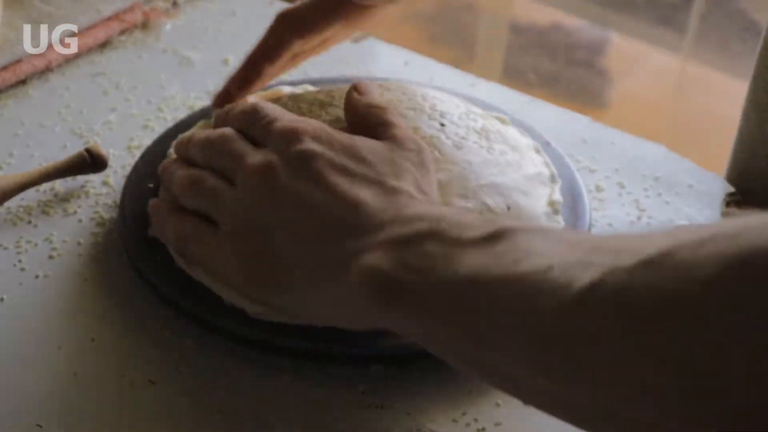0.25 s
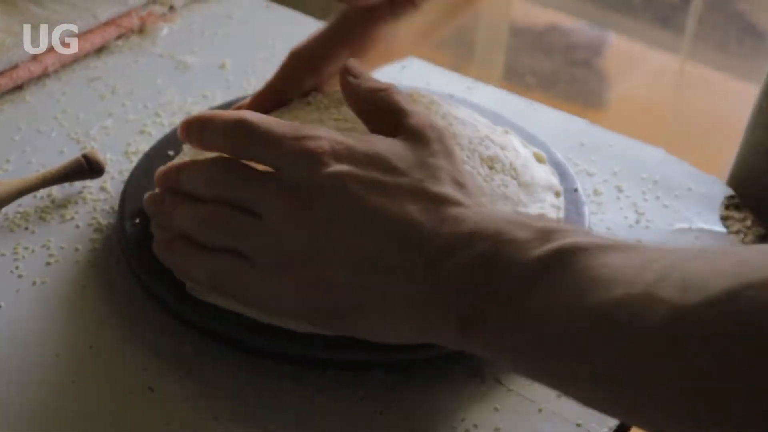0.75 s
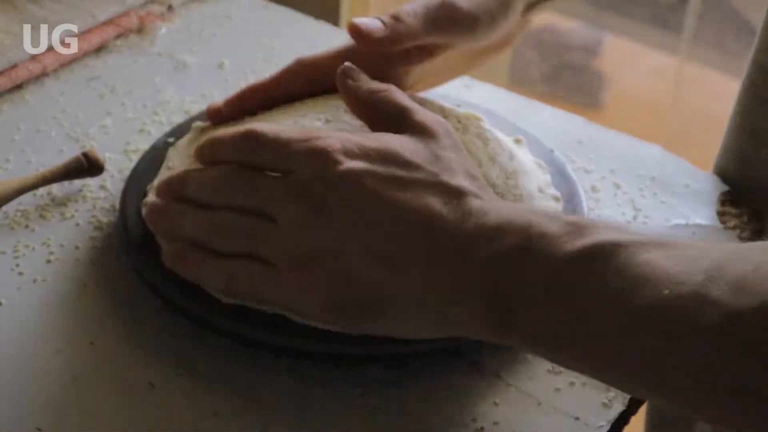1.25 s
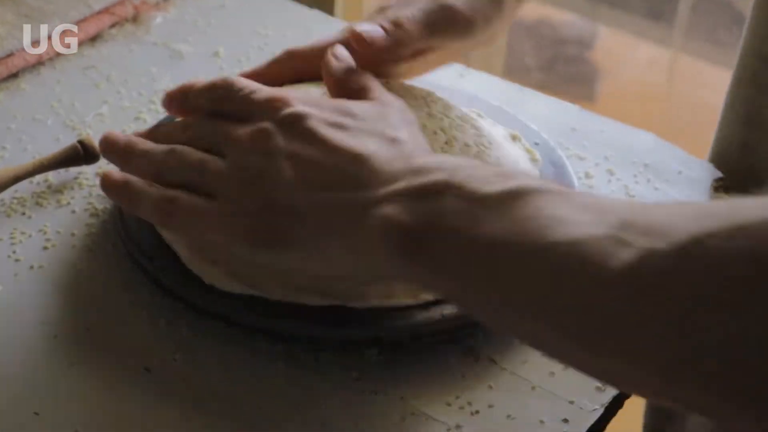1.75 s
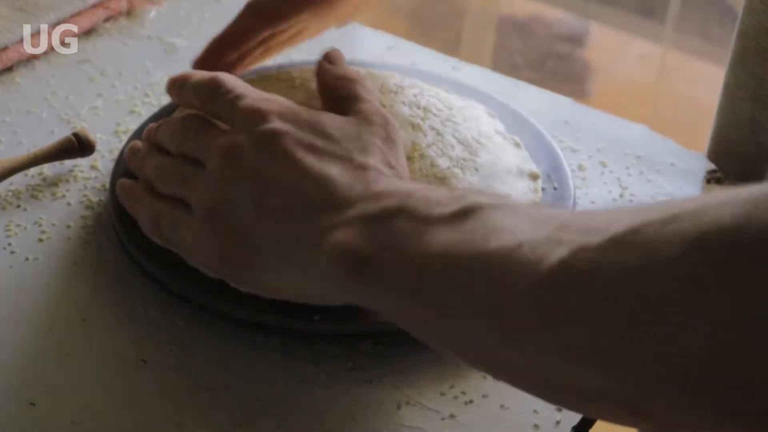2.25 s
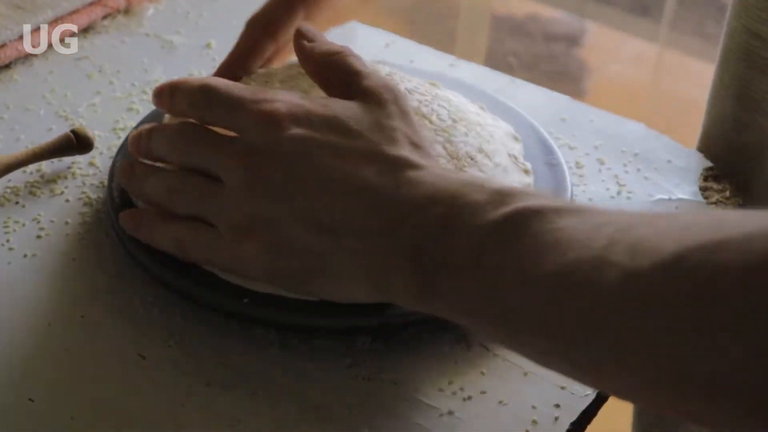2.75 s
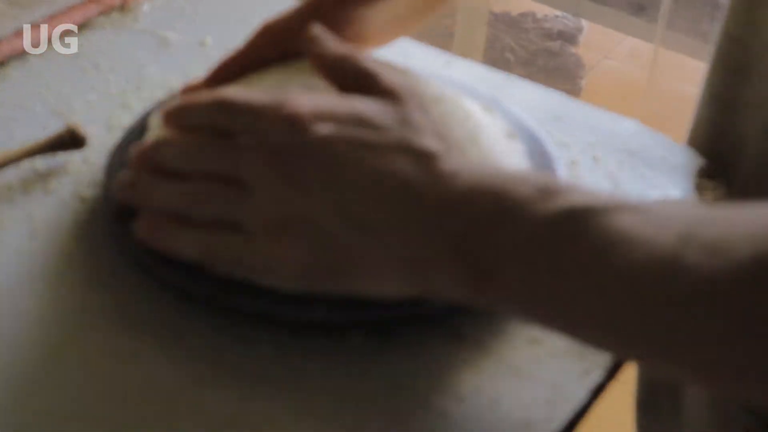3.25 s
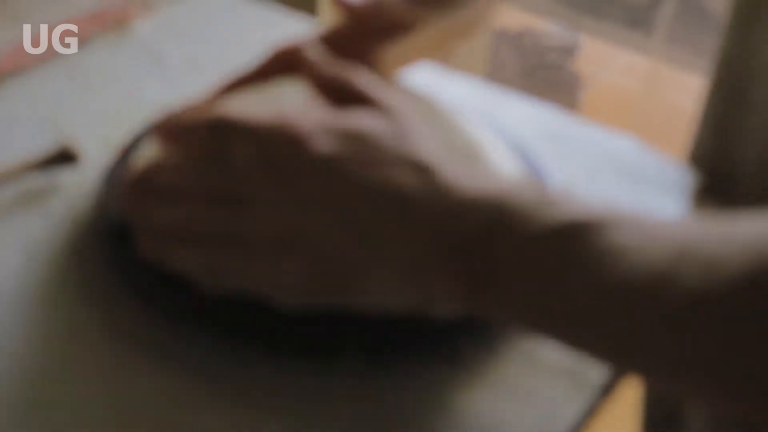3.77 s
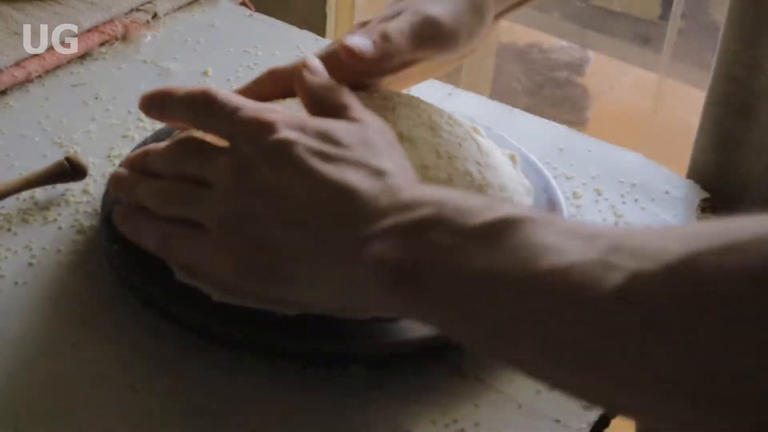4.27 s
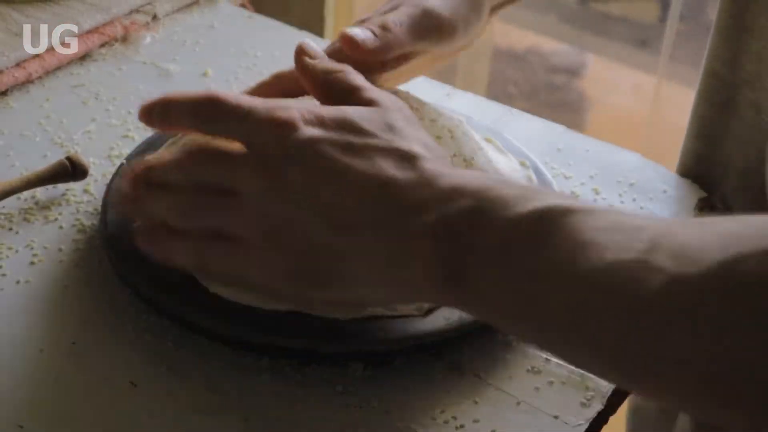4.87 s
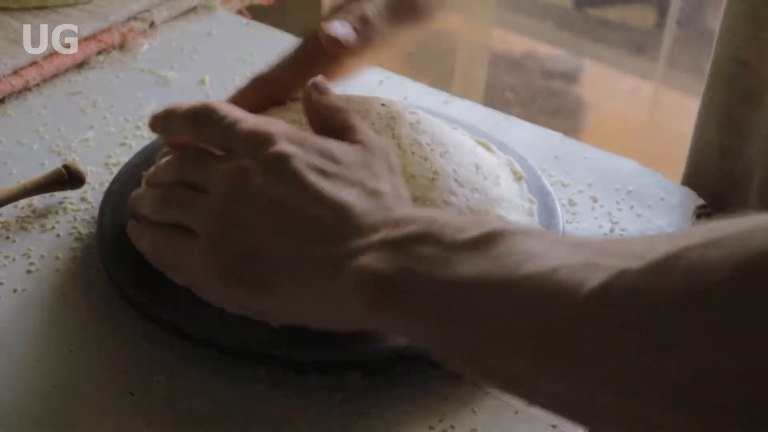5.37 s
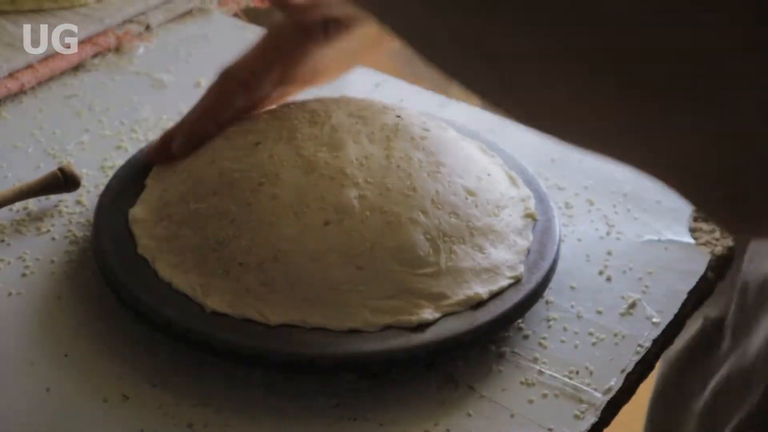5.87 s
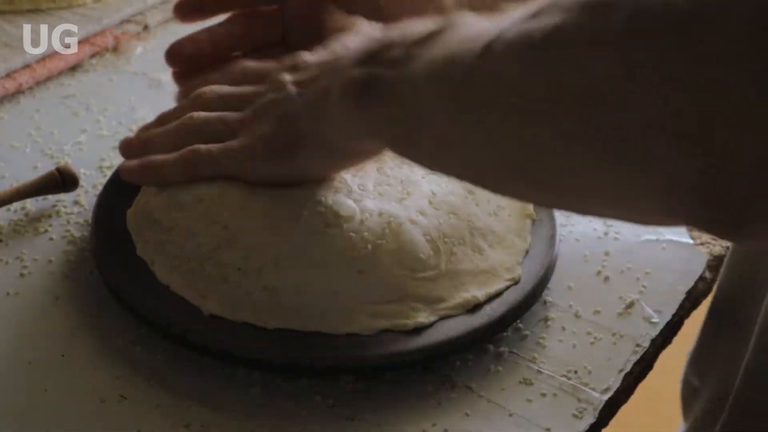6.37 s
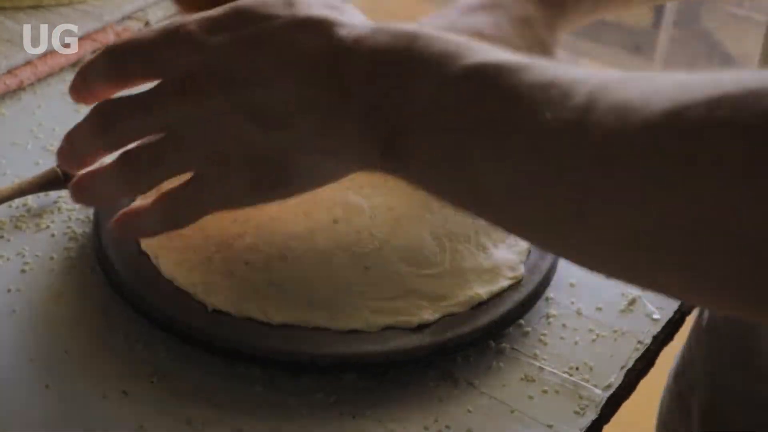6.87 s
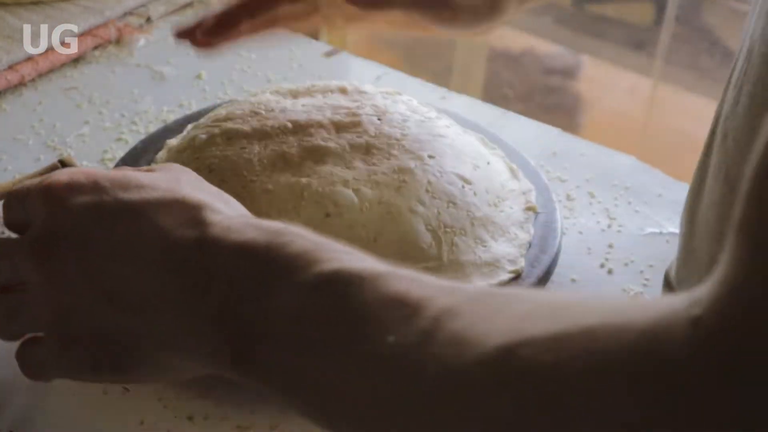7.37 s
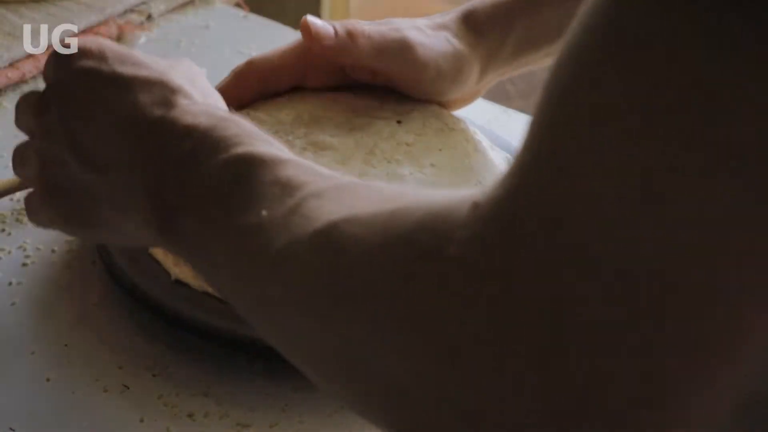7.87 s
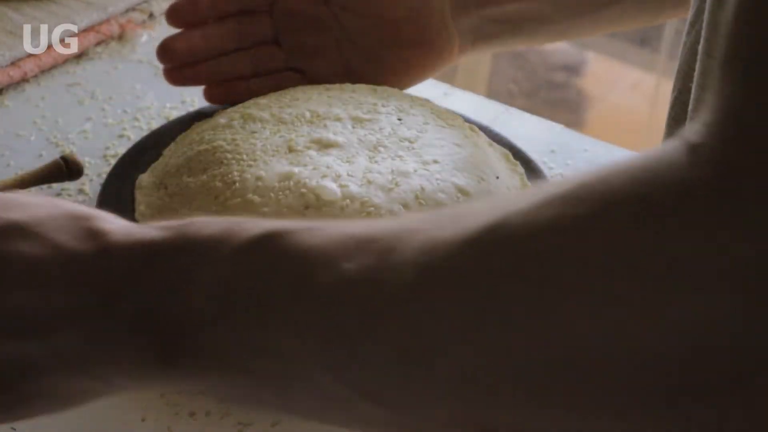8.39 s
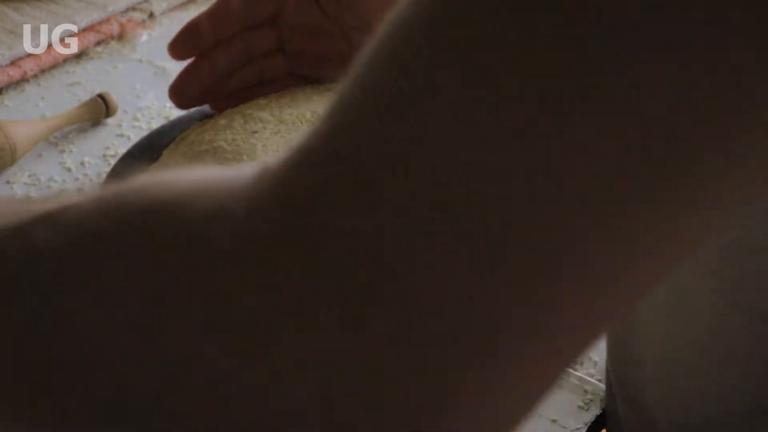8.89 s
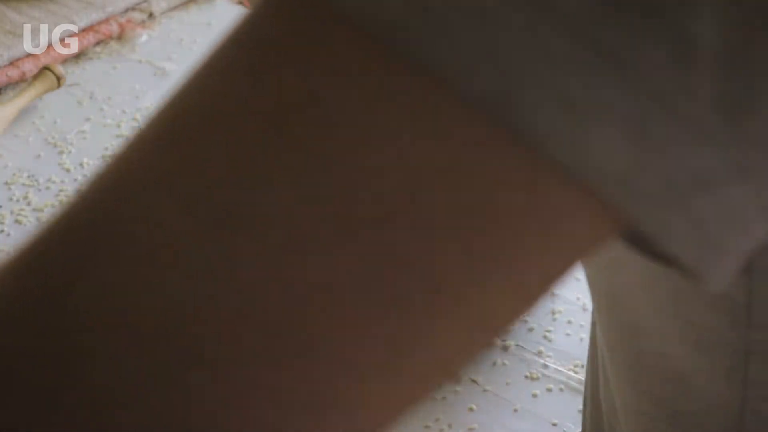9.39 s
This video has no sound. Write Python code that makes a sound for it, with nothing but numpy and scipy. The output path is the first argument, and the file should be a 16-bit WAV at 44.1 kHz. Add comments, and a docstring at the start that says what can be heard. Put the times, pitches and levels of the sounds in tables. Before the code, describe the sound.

Hands pat dough on a board in steady woody thumps and skin slaps, then a tool clatters and clinks over bakery hum.

```python
"""Steady, woody thumps: hands pat a seeded round of dough on a board that lies on a table.
Each pat rings board and table, skin slaps, trapped air pops, and seeds tick and rustle.
Late on a tool knocks the table and its metal clinks. Behind it the bakery hums and hisses.
Two close microphone ports hear it all; the loudest slaps clip."""
import sys
import numpy as np
from scipy import signal
from scipy.fft import rfft, irfft, next_fast_len
from scipy.io import wavfile
from scipy.ndimage import uniform_filter1d

SR = 44100
rng = np.random.default_rng(int(sys.argv[2]) if len(sys.argv) > 2 else 0)


def master_out(mix):
    """Clip the mix to full scale and print it as 16-bit PCM to the path in sys.argv[1]."""
    frames = np.transpose(np.atleast_2d(mix))
    ceiling = np.clip(frames, -1, 1)
    pcm = np.round(ceiling * 32767).astype(np.int16)
    wavfile.write(sys.argv[1], SR, pcm)


N = 425124


def amp(db):
    return 10 ** (np.asarray(db) / 20)


def unit_rms(x):
    return x / np.sqrt(np.mean(x ** 2) + 1e-20)


def at_pitch(points, hz):
    """Follow (f/Hz, value) points along a log frequency axis."""
    f, value = np.transpose(points)
    return np.interp(np.log(hz + 1), np.log(f + 1), value)


def fader(rows, column=1):
    """A gain for every sample, from rows of t/s and level/dB."""
    rows = np.transpose(rows)
    return amp(np.interp(np.arange(N) / SR, rows[0], rows[column]))


def add(mix, start_s, sound):
    part = mix[..., round(start_s * SR):][..., :sound.shape[-1]]
    part += sound[..., :part.shape[-1]]


def swell(peak_ms, count):
    """A soft rise and a longer fall."""
    u = np.arange(count) * 1000 / SR / max(peak_ms, .15)
    return u * np.exp(1 - u)


def push(contact_ms):
    """The force of a blow: one sine cycle, pressing and then springing back for contact_ms each."""
    return np.sin(2 * np.pi * np.arange(0, 1, 500 / SR / contact_ms))


def ring(modes, spread_db, detune):
    """Dying sines; the spot struck changes the strength of each, and their pitches stray a little."""
    hz, db, t60 = np.transpose(modes)[:, :, None]
    t = np.arange(round(.4 * SR)) / SR
    strength, stray = rng.standard_normal((2, len(hz), 1))
    decay = amp(db + spread_db * strength - 60 * t / t60)
    return decay * np.sin(2 * np.pi * hz * (1 + detune * stray) * t)


def crackle(colour, peak_ms):
    """A burst of spiky noise; colour(hz) gives dB."""
    spikes = rng.standard_normal(2048) * amp(6.7 * rng.standard_normal(2048))
    shape = swell(peak_ms, count=2048)
    spikes *= np.linalg.norm(shape) / np.linalg.norm(spikes * shape)
    gain = amp(colour(np.fft.rfftfreq(2048, 1 / SR)))
    return irfft(rfft(spikes * np.sqrt(shape)) * gain) * np.sqrt(shape)


def diffuse_noise(count, colour, size):
    """Stereo noise, centred in the bass and wide in the treble; colour(hz, s) gives dB."""
    # likeness of left and right: f/Hz, correlation
    likeness = [(130, .999), (300, .96), (700, .82), (1500, .5), (4000, 0), (10000, -.4)]
    frames, hz = 4 * count // size + 5, np.fft.rfftfreq(size, 1 / SR)[:, None]
    a, b, c, d = rng.standard_normal((frames, len(hz), 4)).T
    same = at_pitch(likeness, hz)
    left = a + 1j * b
    right = same * left + np.sqrt(1 - same ** 2) * (c + 1j * d)
    spectra = np.array([left, right]) * amp(colour(hz, np.arange(frames) * size / 4 / SR))
    return signal.istft(spectra, nperseg=size, noverlap=3 * size // 4)[1][:, :count]


def room_air():
    """Steady room tone with two broad bands of hiss."""
    # room tone spectrum: f/Hz, relative level/dB
    tone = [(53, -27), (90, 5.5), (212, -1), (411, -12), (928, -16), (1360, -20.5), (1730, -19),
            (2280, -23), (4520, -31), (5980, -24.5), (8060, -36.5), (10900, -50.5), (12900, -51),
            (15000, -77)]
    # hiss bands: f/Hz, width/Hz, boost/dB
    bands = [(6140, 300, 4.5), (10930, 1200, 19)]

    def colour(hz, s):
        return at_pitch(tone, hz) + sum(db * np.exp(-((hz - f) / width) ** 2) for f, width, db in bands)
    return unit_rms(diffuse_noise(N, colour, size=1024)) * amp(-37)


def machine_rumble():
    """Two low machine rumbles swell and fade, each a narrow band of noise."""
    # rumble bands: f/Hz, half width/Hz
    bands = [(51, 5), (68, 19)]
    # their swells: t/s, deep level/dB, upper level/dB
    levels = [(0, -57, -34), (1.5, -40.5, -40), (3.2, -39, -54), (3.7, -35.5, -34), (4.6, -29, -32),
              (5.3, -46, -30), (5.8, -52, -37.5), (7.6, -40, -36), (8.3, -39, -61), (9.1, -58, -33),
              (9.64, -46, -38)]
    out = np.zeros(N)
    for column, (hz, width_hz) in enumerate(bands, start=1):
        wobble = signal.lfilter(*signal.butter(2, width_hz, fs=SR), rng.standard_normal((2, N)))
        carrier = np.exp(2j * np.pi * hz * np.arange(N) / SR)
        out += unit_rms(((wobble[0] + 1j * wobble[1]) * carrier).real) * fader(levels, column)
    return out


def room_reverb(slow_feed, fast_feed):
    """Three decaying noise tails take the sound in turn, so the echoes stay diffuse and keep changing."""
    # reverb time: f/Hz, t60/s
    decay = [(100, 1), (300, 0.5), (1000, 0.62), (3000, 0.63), (8000, 0.39), (14000, 0.38)]
    # reverb tone: f/Hz, level/dB
    tone = [(100, 4), (400, 1.5), (1500, -3), (5000, -2), (12000, -4.5), (15000, -22)]
    out, t = np.zeros((2, N)), np.arange(N) / SR
    count, hold_s = round(.7 * SR), .13

    def colour(hz, s):
        t60 = at_pitch(decay, hz)
        bass_drop = at_pitch([(150, -7), (500, .5), (3000, -.5)], hz) * (s > hold_s)
        return bass_drop - 60 * s / t60 - 10 * np.log10(t60)
    for k in range(3):
        tail = diffuse_noise(count, colour, size=256)
        tail *= 1 - np.exp(-t[:count] / .0056)  # echoes build up
        tail /= np.linalg.norm(tail[0])
        tail = irfft(rfft(tail) * amp(at_pitch(tone, np.fft.rfftfreq(count, 1 / SR))), count)
        # thumps drift slowly between tails; crackle and pops switch quickly, keeping their echo smooth
        slow, fast = (np.sqrt(2 / 3) * np.cos(np.pi * (rate * t + k / 3)) for rate in (1.2, 350))
        out += signal.fftconvolve((slow_feed * slow + fast_feed * fast)[None], tail, axes=1)[:, :N]
    return out


def seed_rustle():
    """Seeds shift under the palms: dense, bright, tiny clicks that come in clumps."""
    # rustle bed: t/s, level/dB
    levels = [(0, -43.5), (.5, -49), (1.3, -46.5), (2.55, -49.5), (3, -56), (4.1, -50), (4.8, -50.5),
              (5.6, -48.5), (6.1, -59), (7.2, -69), (7.5, -57), (7.75, -52), (8.3, -60), (9.64, -49.5)]
    # a palm slides over the dough: middle t/s, half length/s, level/dB
    strokes = [(6.45, 0.057, -40.5), (7.03, 0.099, -46), (7.382, 0.084, -41), (9.505, 0.043, -49)]
    clumps = unit_rms(uniform_filter1d(uniform_filter1d(rng.standard_normal(N), size=500), size=500))
    clicks = rng.standard_normal((2, N)) * amp(1.2 * rng.exponential(1, N) + 3.3 * clumps)
    clicks *= rng.random(N) < 6000 / SR  # about 6000 a second
    clicks[1] = .53 * clicks[1] - .55 * clicks[0]  # right partly opposes left
    bright = signal.sosfilt(signal.butter(2, 2000, "high", fs=SR, output="sos"), clicks)
    bright = signal.sosfilt(signal.butter(6, 12300, fs=SR, output="sos"), bright)
    slides = sum(amp(db) * np.exp(-((np.arange(N) / SR - s) / half) ** 2) for s, half, db in strokes)
    return unit_rms(bright) * (fader(levels) + slides)


def metal_clinks():
    """The tool's metal rings high when tapped on its edge, low when it rocks."""
    # clinks: t/s, level/dB, low modes re level/dB
    hits = [(8.674, -25, -16), (8.752, -29, -16), (8.768, -45, 23), (8.828, -13, -20)]
    # modes of the metal: f/Hz, level/dB, t60/s
    modes = [(1800, -7, .3), (1800, -1, .035), (1860, -7, .03), (2480, -9, .03), (2920, -1, .05),
             (3120, -10, .05), (3280, -6, .035), (7820, -4, .025), (8005, 1, .04), (8060, -21, .2),
             (8230, -5, .022), (8480, -11, .02), (13570, -26, .1)]
    out, is_low = np.zeros(N), np.array(modes)[:, :1] < 4000
    for s, db, low_db in hits:
        partials = ring(modes, spread_db=1.5, detune=.003) * amp(db + low_db * is_low)
        add(out, s, partials.sum(0))
    return out


def tool_knocks():
    """A wooden handle rings the table and chatters on; the shorter the contact, the brighter."""
    # knocks: t/s, level/dB, contact/ms
    hits = [(8.674, -1.5, 0.55), (8.7517, -16.5, 2.1), (8.7557, -8.5, 1.52), (8.903, -20, 0.8),
            (8.942, -18.5, 1.2), (9.085, -22, 0.92), (9.095, -9.5, 0.48), (9.109, -9, 1.68),
            (9.201, -16, 0.33), (9.243, -17.5, 1.7), (9.506, -26, 0.38), (9.52, -23, 0.32)]
    # modes of table top and handle: f/Hz, level/dB, t60/s
    modes = [(135, -19, 0.061), (212, 1, 0.13), (245, 4.5, 0.06), (307, 1.5, 0.038), (371, -1.5, 0.038),
             (510, 3.5, 0.037), (575, 3, 0.031), (656, 3, 0.034), (823, 3, 0.017), (1030, 2, 0.024),
             (1270, -2, 0.027), (1820, -3, 0.023), (2300, -13, 0.013), (3400, -13, .02)]
    out = np.zeros(N)
    for s, db, contact_ms in hits:
        chatter = .2 * rng.standard_normal(1800) * swell(peak_ms=4.6, count=1800)
        chatter *= rng.random(1800) < .05
        chatter[0] = 1  # the knock itself
        force = np.convolve(push(contact_ms), chatter)
        force[:1800] += .27 * chatter  # a hard edge on each contact
        knock = signal.fftconvolve(ring(modes, spread_db=3, detune=.033).sum(0), force)
        add(out, s, amp(db) * knock / abs(knock).max())
    return out


def short_ticks():
    """Very short ticks, dull or bright: seeds, sticky skin and, late on, the tool's sharp taps."""
    # ticks: t/s, level/dB, brightness/dB
    hits = [(.124, -22, -3), (0.147, -6.5, 2.5), (.1704, -23, 18), (.293, -28, -2), (.344, -29, 4),
            (0.375, -28, 0), (.425, -24, 2), (0.521, -33, 13), (0.538, -26.5, 19.5), (0.631, -30, 4),
            (0.8041, -21, 12.5), (0.9268, -10.5, 9), (0.9712, -14.5, 1), (0.976, -21, 4),
            (1.0358, -33, 29.5), (1.058, -38, 12), (1.0947, -30, 16), (1.289, -20, 1), (1.3102, -7.5, 3.5),
            (1.593, -24, -1), (1.604, -26, 13), (1.796, -5.5, -0.5), (2.1384, -17.5, 2.5),
            (2.448, -17, 4.5), (2.639, -4.5, -12.5), (3.013, -22, 0), (3.2207, -22.5, -11),
            (4.02, -13, 4.5), (4.047, -19, -5), (4.058, -28, -7), (4.959, -20.5, -3), (5.24, -19, -1),
            (5.327, -31, -17.5), (5.522, -20, -3), (7.8422, -15, 3), (8.6743, -7, -2), (8.753, -16, -3),
            (8.827, -13, 1)]
    # tick spectrum: f/Hz, level/dB
    tone = [(500, -8), (1900, -0.5), (3300, -4), (4600, -3.5), (10000, -10.5), (16000, -27)]
    out, tilt = np.zeros(N), [(1900, -.81), (10000, .97)]  # f/Hz, weight
    for s, db, bright_db in hits:
        tick = crackle(lambda hz: db + at_pitch(tone, hz) + bright_db * at_pitch(tilt, hz), peak_ms=.93)
        add(out, s, tick)
    return out


def air_pops():
    """Air escapes a cupped palm: a few cycles of the pocket's note, sagging a little."""
    # pops: t/s, level/dB, f/Hz
    hits = [(1.233, -24, 1480), (1.7795, -32, 3380), (2.081, -22.5, 3390), (2.359, -25, 1420),
            (2.637, -19, 1450), (2.6395, -17.5, 2450), (3.752, -27.5, 1590), (4.032, -31, 1560),
            (4.3045, -16, 2410), (4.5879, -18, 2370), (4.8776, -29, 1560), (5.1617, -25, 3050),
            (5.4432, -22, 2230), (5.613, -30, 1000), (5.7054, -22.5, 2190), (5.947, -20.5, 2410),
            (6.191, -8, 1990), (6.1927, -3.5, 4420), (6.6885, -6.5, 3640), (6.7015, -20, 4730),
            (7.565, -30, 1560), (7.844, -14.5, 2540), (9.41, -28, 1370), (9.41, -24, 2730)]
    out, t, rise_cycles = np.zeros(N), np.arange(1500) / SR, 2.5
    for s, db, hz in hits:
        note = np.sin(2 * np.pi * hz * t * (1 - t) + 2 * np.pi * rng.random())
        add(out, s, amp(db) * note * swell(1000 * rise_cycles / hz, count=1500))
    return out


def skin_slaps():
    """Skin meets dough in a burst of crackle, with more or less fleshy body."""
    # slaps: t/s, level/dB, body/dB, time to peak/ms
    hits = [(0.3298, -38, -7, 6.8), (0.406, -37.5, 3, 9.3), (0.691, -41, -1, 7.6), (1.197, -38.5, -3, 5.9),
            (1.216, -34, 0, 3), (1.244, -32, -11, 2.8), (1.503, -29, 1, 1.7), (1.53, -36, -10, 4),
            (1.8102, -26, 12, 1.7), (1.8618, -29, -6, 2.3), (2.0797, -28, -16, 3), (2.3495, -28, -22, 9.5),
            (2.72, -29, 13, 3.4), (2.922, -34.5, 2, 5.2), (2.933, -35.5, 14, 2.5), (3.185, -34, -4, 1.6),
            (3.206, -30.5, -23, 4), (3.483, -39, -14, 8.5), (3.754, -37, 14, 1.2), (3.766, -28, 9, 1.66),
            (4.2962, -34.5, 4, 4.3), (4.3047, -31.5, 24, 1.7), (4.579, -31.5, -3, 5.5),
            (4.589, -33, 35, 3.2), (4.86, -35, 4, 3.9), (4.877, -38, 29, 0.85), (5.1511, -34, 0, 4.7),
            (5.1617, -29, 20, 1.1), (5.4416, -30.5, 22.5, 2.5), (5.7022, -28, 11, 4),
            (5.9358, -28.5, 5, 3.7), (6.1885, -2.5, -31, 2.1), (6.1907, -12, -36, 1.1),
            (6.1946, -25, -5, 1.4), (6.537, -37, 31, 1.3), (6.683, -3.5, -29, 2.4),
            (6.686, -5.5, -15, 0.93), (6.6905, -15, -16, 1.6), (7.5508, -28, -2, 6.8),
            (7.83, -26.5, 3, 6.5), (9.406, -32.5, 7, 3.8), (9.423, -39.5, 17, 1.9)]
    # slap spectrum: f/Hz, level/dB
    tone = [(500, 10.5), (1200, 7.5), (2300, 7), (3500, 5.5), (5000, 1), (10000, -3.5), (16000, -17)]
    out, body = np.zeros(N), [(1900, .4), (4600, .047)]  # f/Hz, weight
    for s, db, body_db, peak_ms in hits:
        slap = crackle(lambda hz: db + at_pitch(tone, hz) + body_db * at_pitch(body, hz), peak_ms)
        add(out, s, slap)
    return out


def palm_pats():
    """The palm thumps the board's low modes (row 0); fingers patter on the upper ones (row 1)."""
    # palm blows: t/s, level/dB, patter re level/dB
    blows = [(0.082, -25, 1), (.161, -21, -13), (.367, -15.5, -6.5), (0.421, -25, -8), (.657, -18.5, -3.5),
             (.93, -18, -2), (.939, -13, -7.5), (1.222, -10.5, -4.5), (1.236, -10.5, -7.5),
             (1.505, -9.5, -4), (1.7955, -3, -5.5), (2.074, -7, -6), (2.082, -16, -10),
             (2.3486, -6.5, -11.5), (2.3595, -11.5, -9), (2.6391, -2, -0.5), (2.921, -2.5, -9),
             (3.206, -3.5, -6.5), (3.474, -14.5, -8), (3.753, -5.5, -10), (4.019, -20.5, -18),
             (4.033, -8.5, -12), (4.049, -8, -20), (4.305, -10, -4.5), (4.586, -10, -4.5),
             (4.874, -10.5, -5.5), (5.164, -9.5, -7), (5.197, -17, -17), (5.243, -22.5, -5.5),
             (5.445, -14, -4), (5.464, -15.5, -10), (5.704, -15, -1.5), (5.934, -9, -5.5), (6.19, -8, -1),
             (6.229, -14.5, -25), (6.536, -7.5, -10), (6.686, -9, -5.5), (6.692, -24, -16),
             (6.7092, -10, -26), (6.724, -13, -17), (7.05, -18, -14), (7.557, -7, -4.5), (7.8424, -1.7, -2)]
    # modes of board and table: f/Hz, level/dB, t60/s
    board = [(107.5, -13.5, 0.25), (214, -2.5, 0.18), (245.6, 1.5, 0.081), (323.5, 2.5, 0.029),
             (367.3, -9, 0.14), (483, 3, 0.041), (548, 15.5, 0.046), (815, 10, 0.0024), (966, -2.5, 0.021),
             (1055, -5.5, 0.019), (1413, -10, 0.017), (1830, -9.5, 0.0038), (2220, -13, 0.0075)]
    # strength of the two main deep notes: t/s, level/dB
    deep_ring = [(1, -1.5), (3.3, -3), (5.9, -4), (8, -6)]
    soft_db, straggle_ms, finger_ms = -9.5, 16.59, 5.46
    out, is_upper = np.zeros((2, N)), np.array(board)[:, 0] > 800
    for s, db, patter_db in blows:
        modes = ring(board, spread_db=3.5, detune=.021)
        modes[1:3] *= amp(np.interp(s, *np.transpose(deep_ring)))
        loose = 1 - np.clip((db - soft_db) / 11, 0, .8)  # harder blows land more at once
        fingers = rng.standard_normal(1800) * amp(2.8 * rng.standard_normal(1800))
        fingers *= swell(finger_ms * loose, count=1800)
        thump = signal.fftconvolve(modes[~is_upper].sum(0), push(contact_ms=1.7))[:modes.shape[1]]
        lags, shares = rng.random((2, 3))  # heel, fingers and other hand do not land together
        thump += sum(.51 * loose * share * np.roll(thump, round(lag * straggle_ms * SR / 1000))
                     for lag, share in zip(lags, shares))
        patter = signal.fftconvolve(modes[is_upper].sum(0), fingers)[:len(thump)]
        add(out[0], s, amp(db) * thump / abs(thump).max())
        add(out[1], s, amp(db + patter_db) * patter / abs(patter).max())
    return out


def mic_ports(x):
    """Two ports hear a close source with phase and level offsets that depend on pitch."""
    # left ahead of right: f/Hz, phase/rad
    lead = [(60, .03), (130, .07), (300, .3), (1000, .65), (2500, 1.3), (5000, 1.7), (10000, 2.0),
            (15000, 1.9)]
    # left over right: f/Hz, level/dB
    balance = [(60, 0), (250, 1), (1200, -.8), (2500, 0), (5500, 4.5), (10000, 2), (14000, -1.5)]
    size = next_fast_len(N)
    hz = np.fft.rfftfreq(size, 1 / SR)
    left = amp(at_pitch(balance, hz) / 2) * np.exp(.5j * at_pitch(lead, hz))
    return irfft(rfft(x, size) * np.array([left, 1 / left]), size)[:, :N]


def scene():
    """Close hands and tool, their reverb, and the bakery behind them."""
    # reverb sends by source ("knock" is the finger patter): level/dB
    send_db = dict(thud=-3.5, knock=-5, pops=-5, slaps=-1.5, ticks=-5.5, tool=-3, metal=-9)
    send = {name: amp(db) for name, db in send_db.items()}
    thud, patter = palm_pats()
    slaps, ticks = skin_slaps(), short_ticks()
    tool, metal, pops = tool_knocks(), metal_clinks(), air_pops()
    patter_send = send["knock"] * patter
    slow_feed = patter_send + send["thud"] * thud + send["tool"] * tool + send["metal"] * metal
    fast_feed = patter_send + send["slaps"] * slaps + send["ticks"] * ticks + send["pops"] * pops
    direct = mic_ports(thud + patter + slaps + ticks + pops + tool + metal)
    return direct + room_reverb(slow_feed, fast_feed) + seed_rustle() + room_air() + machine_rumble()


def record(dry):
    """The bass is cut, the capsules fade at the top, peaks clip and a steep low-pass ends the treble."""
    dry = signal.sosfilt(signal.butter(2, 33, "high", fs=SR, output="sos"), dry)
    dry = signal.sosfilt(signal.butter(4, 14200, fs=SR, output="sos"), dry)
    band_limit = signal.firwin(511, 15700, window=("kaiser", 9), fs=SR)
    return signal.oaconvolve(np.clip(dry, -1, 1), band_limit[None], "same")


dry = scene()
out = record(dry)
master_out(out)
```